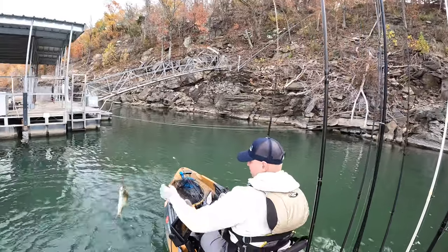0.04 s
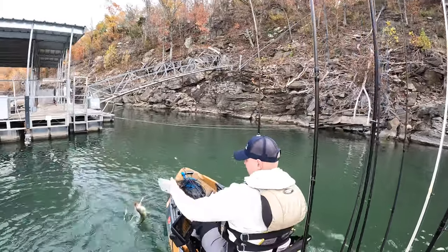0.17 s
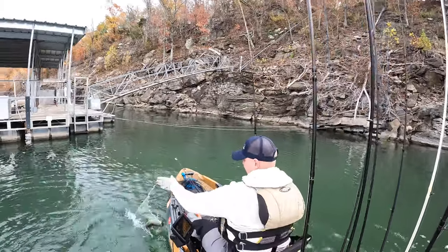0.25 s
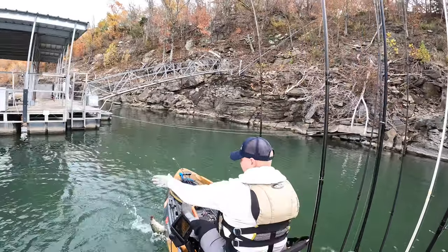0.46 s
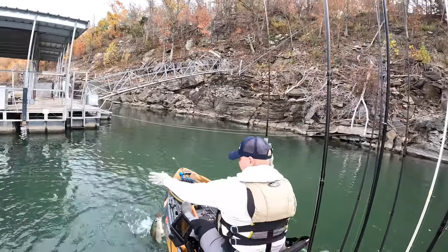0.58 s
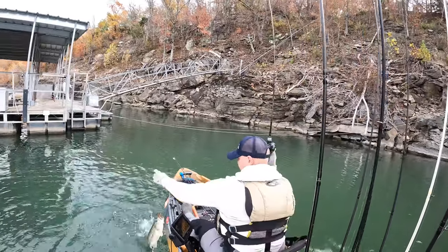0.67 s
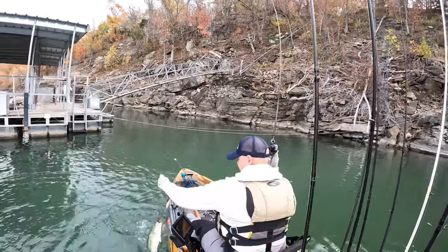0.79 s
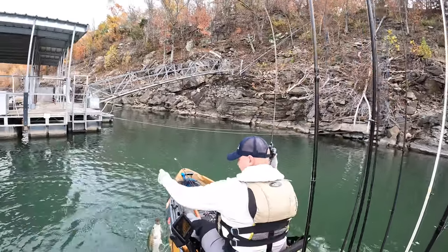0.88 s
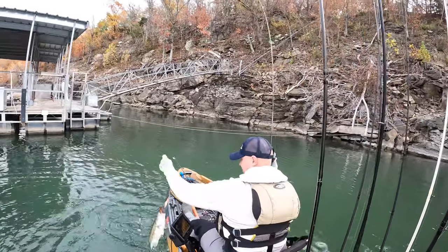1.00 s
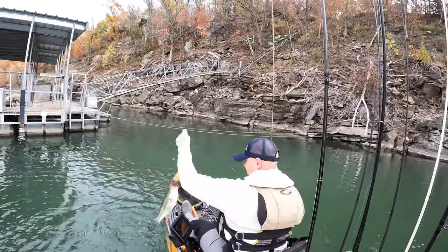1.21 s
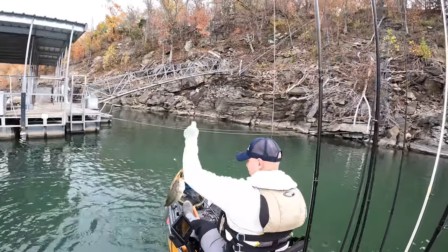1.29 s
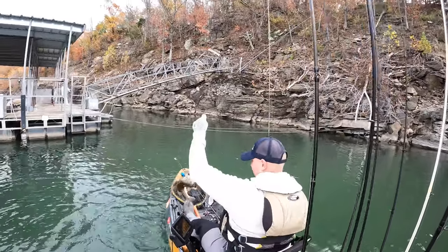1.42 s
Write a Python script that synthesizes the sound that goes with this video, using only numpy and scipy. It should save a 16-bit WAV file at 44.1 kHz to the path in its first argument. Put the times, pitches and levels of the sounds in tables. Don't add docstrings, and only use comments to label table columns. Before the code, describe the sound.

A fish splashes hard at the surface beside a small plastic boat, with crisp spray, gurgling bubbles and hollow hull thumps, then drips and faint knocks; close outdoor stereo microphone on a quiet lake.

```python
import sys
import numpy as np
from scipy import signal
from scipy.fft import rfft, irfft, next_fast_len
from scipy.io import wavfile
from scipy.ndimage import map_coordinates

SR = 44100
rng = np.random.default_rng(int(sys.argv[2]) if len(sys.argv) > 2 else 0)


def gain_from_db(level_db):
    decades = np.asarray(level_db, float) / 20
    return 10 ** decades


def int16_out(signal):
    q = np.round(np.clip(np.atleast_2d(signal).T, -1, 1) * 32767)
    wavfile.write(sys.argv[1], SR, q.astype(np.int16))


N = 63945


def unit(x):
    return x / np.sqrt(np.mean(x ** 2) + 1e-20)


def along(points, hz):
    pitch, value = np.transpose(points)
    return np.interp(np.log(hz + 1), np.log(pitch + 1), value)


def curve(rows):
    time, level = np.transpose(rows)
    return np.interp(np.arange(N) / SR, time, level)


def wobble(rate):
    return map_coordinates(rng.standard_normal(2000), [np.arange(N) * rate / SR])


def coloured(x, points):
    size = next_fast_len(N + 8192)
    gain = gain_from_db(along(points, np.fft.rfftfreq(size, 1 / SR)))
    return irfft(rfft(x, size) * gain, size)[..., :N]


def bubbles(start, gain, hz, cycles, size):
    rise, soft_cycles = 0.24, 1.665
    t = np.arange(size) / SR
    age = t * (hz / cycles)[:, None]
    wave = np.sin(2 * np.pi * hz[:, None] * t * (1 - rise / 4 + rise * np.minimum(age, 2) / 2))
    fade = gain_from_db(-30 * age)
    swell = 1 - np.exp(-t * hz[:, None] / soft_cycles)
    wave *= gain[:, None] * fade * swell
    place = np.round(start * SR).astype(int)[:, None] + np.arange(size)
    return np.bincount(place.ravel(), wave.ravel(), N + SR)[:N]


def swarm(count, hz, spread, cycles, scatter_db, size):
    chance = rng.random((count, 2))
    vary = rng.standard_normal((count, 2))
    pitch = np.minimum(hz * np.exp(spread * np.clip(vary[:, 0], -1.3, 2)), 14000)
    loudness_db = np.minimum(-scatter_db * np.log(1 - chance[:, 1]), 12)
    life = cycles * np.exp(0.45 * vary[:, 1])
    return unit(bubbles(chance[:, 0] * N / SR, gain_from_db(loudness_db), pitch, life, size))


def lake():
    # (pitch [Hz], level [dB])
    lake_colour = [(250, -34), (450, -24), (850, -38), (1300, 0), (3000, -20.5), (6500, -5.5),
                   (11000, -16.5), (15400, -33)]
    level_db, sway_db, side_db = -64.5 - 2.0, 1.5, -11
    hiss = unit(coloured(rng.standard_normal((2, N)), lake_colour))
    mid, side = hiss * gain_from_db(level_db + sway_db * wobble(12.7))
    return np.array([mid + gain_from_db(side_db) * side, mid - gain_from_db(side_db) * side])


def slosh():
    # (time [s], level [dB])
    slosh_level = [(0, -50), (.12, -57.5), (.2, -62), (.3, -38.5), (.6, -48), (.76, -47.5), (.95, -60.5),
                   (1.25, -55.5), (1.45, -51)]
    # (pitch [Hz], level [dB])
    slosh_colour = [(10, 0), (30, -2), (90, -10.5), (230, -13), (380, -22), (550, -27), (1000, -45)]
    sway_db, side_db = 2, -6.5
    push = unit(coloured(rng.standard_normal((2, N)), slosh_colour))
    mid, side = push * gain_from_db(curve(slosh_level) + sway_db * wobble(25.65))
    return np.array([mid + gain_from_db(side_db) * side, mid - gain_from_db(side_db) * side])


def bursts(count):
    # (time [s], peak [dB], length [s], middle pitch [Hz])
    snaps = [(.112, -40, 0.017, 6000), (.137, -40.5, 0.014, 5550), (.1555, -25.5, 0.014, 6670),
             (0.2028, -26.5, 0.022, 6000), (.229, -21, 0.006, 7400), (0.2674, -21.5, 0.0035, 6000),
             (0.286, -19.5, 0.0026, 9000), (.306, -15.5, 0.0051, 7000), (.311, -31.5, 0.026, 4080),
             (.346, -25, 0.0053, 7400), (.3565, -18, .003, 8200), (.361, -20, 0.0063, 3400),
             (.421, -27, 0.011, 6000), (.431, -22, 0.007, 5150), (.439, -28, 0.009, 4550),
             (.453, -29.5, 0.0048, 3570), (.458, -26.5, 0.0039, 6860), (.469, -22, .01, 5300),
             (.482, -29.5, .004, 5000), (.519, -30, 0.0048, 6000), (.574, -26.5, 0.0022, 6800),
             (.596, -26, 0.0027, 6460), (.613, -29, .005, 6000), (.688, -31, 0.0037, 3930),
             (.730, -29.5, 0.0039, 6800), (.746, -28.5, 0.0021, 6700), (.766, -33, 0.0063, 6000),
             (.8305, -31.5, 0.004, 4200), (0.9011, -30.5, 0.0018, 7300), (1.131, -45, 0.0023, 4070),
             (1.147, -51.5, 0.0072, 1424), (1.226, -53, 0.0058, 1133), (1.307, -52, 0.005, 1020),
             (1.325, -54.5, 0.0059, 1660), (1.417, -46.5, 0.0045, 1760), (1.432, -42.5, 0.018, 9200),
             (1.4405, -45, 0.0036, 7470),
             (0.03, -54.5, .004, 2460), (.065, -47, 0.0033, 6000), (0.083, -41.5, .005, 7450),
             (0.507, -30.5, .004, 3400), (0.553, -30.5, .003, 5440), (.738, -34.5, .004, 4230),
             (0.801, -43, .004, 2650), (0.804, -34.5, .003, 7400), (0.827, -39, .002, 8000),
             (0.864, -46, .008, 1900), (.875, -43, .005, 4830), (0.932, -50, .003, 2560),
             (0.947, -49, .004, 5500), (.957, -39, .004, 4470), (.967, -41.5, .005, 5130),
             (1.33, -60, .002, 9000), (1.386, -51, .003, 2010)]
    tears = np.array(snaps)
    start, db, length, hz = np.repeat(tears, count, axis=0).T
    turn = np.tile(np.linspace(.01, 1, count) ** 1.4, len(tears))
    vary = rng.standard_normal((len(start), 3))
    pitch = hz * np.exp(0.423 * vary[:, 1])
    gain = gain_from_db(db - 1.9 - 15.4 * turn + 1.8 * np.clip(vary[:, 0], -2, 1.6))
    gain *= np.sqrt(length / 0.0025) * np.minimum(turn / 0.11, 1)
    gain *= (pitch < 14500) / (1 + (pitch / 12500) ** 2)
    life = 7 * np.exp(0.28 * vary[:, 2])
    return bubbles(start + 1.5 * length * turn, gain, np.clip(pitch, 400, 14500), life, size=400)


def spray():
    # (time [s], level [dB])
    spray_level = [(0, -93), (.08, -63.5), (.15, -50), (.2, -53.5), (.33, -37.5), (.39, -45), (.45, -45),
                   (.55, -50), (.72, -51.5), (.79, -58), (.97, -62.5), (1.05, -71.5)]
    # (pitch [Hz], level [dB])
    spray_colour = [(1470, -39), (2500, -5), (3360, -8), (7640, -2.5), (12000, -23), (15400, -44)]
    sway_db = 2
    hiss = unit(coloured(rng.standard_normal(N), spray_colour))
    fizz = swarm(count=4000, hz=6000, spread=0.451, cycles=7.7, scatter_db=6.5, size=200)
    mix = gain_from_db(-3) * hiss + gain_from_db(-3) * fizz
    return gain_from_db(curve(spray_level) + sway_db * wobble(59.9)) * mix + bursts(count=90)


def churn():
    # (time [s], level [dB])
    churn_level = [(.08, -69.5), (.16, -53.5), (.22, -38.5), (.36, -35.5), (.41, -41), (.465, -38),
                   (.52, -41), (.59, -46.5), (.67, -39.5), (.76, -50.5), (.8, -55.5), (.92, -61),
                   (1.1, -71.5), (1.2, -75.5), (1.45, -62)]
    # (pitch [Hz], level [dB])
    churn_colour = [(400, -18), (750, -7), (1100, -10), (2400, -9.5), (5000, -19.5), (8000, -50)]
    # (time [s], peak [dB], pitch [Hz], life [cycles])
    big_bubbles = [(0.1215, -25, 3650, 8.3), (0.144, -27, 2370, 7.2), (0.1605, -15, 2060, 9.2),
                   (0.1617, -21.5, 2000, 16.4), (0.164, -41.5, 520, 24), (0.176, -25, 1380, 7.5),
                   (0.2028, -13, 1210, 3.9), (0.207, -8.5, 1100, 4.6), (.222, -19.5, 2800, 7.4),
                   (.237, -13.5, 565, 4.1), (.248, -20.5, 2120, 7.7), (0.2521, -20, 296, 4.1),
                   (0.267, -15, 1890, 4.6), (.271, -21.5, 520, 7.9), (.309, -18, 1700, 12),
                   (0.314, -4, 1600, 2.3), (0.3387, -9.5, 2540, 4.8), (0.3658, -5.5, 2200, 5.4),
                   (.542, -34.5, 1215, 30), (.563, -20, 1030, 4.1), (.500, -24, 1200, 6.6),
                   (.508, -27.5, 970, 7.4), (0.549, -27.5, 1800, 6), (.604, -31.5, 950, 9.7),
                   (0.613, -16, 1350, 1.8), (.619, -23, 1520, 3.9), (.624, -26.5, 924, 4.9),
                   (.632, -26.5, 855, 6.1), (.651, -22.5, 1080, 4.5), (.654, -27, 2450, 9.8),
                   (0.671, -36.5, 1200, 14), (.714, -26, 1800, 6.6), (0.729, -36, 1840, 15),
                   (0.455, -25, 1110, 11), (.460, -19.5, 1790, 7.5), (0.687, -25, 2400, 10.7),
                   (.746, -32.5, 1375, 17)]
    # (time [s], peak [dB], pitch [Hz], life [cycles])
    drips = [(.100, -50, 1090, 23), (.823, -31.5, 2360, 12), (0.83, -27, 1500, 14), (.8318, -20, 1900, 3.6),
             (.830, -22, 2000, 12.5), (.838, -39, 2800, 8.8), (0.8294, -25.5, 1293, 22.3),
             (0.8734, -26, 1368, 9.8), (.876, -35, 4200, 12), (.850, -39, 6840, 16), (0.893, -44, 3300, 18),
             (.832, -35.5, 7900, 16), (.905, -54, 770, 27), (0.943, -38.5, 3400, 12.5),
             (.947, -44, 3150, 27), (.967, -42.5, 5600, 36), (.970, -47, 3000, 20), (.929, -44.5, 1570, 12),
             (.940, -46, 1230, 16), (1.13, -51, 1080, 35), (1.274, -56, 1940, 34), (0.028, -51, 1010, 11.5),
             (0.94, -54, 570, 3.1), (1.1, -51, 705, 8.1), (1.3075, -49, 750, 7), (1.2, -38, 2100, 5.7),
             (1.212, -53, 1840, 11), (1.437, -50, 1520, 10)]
    wash = unit(coloured(rng.standard_normal(N), churn_colour))
    crowd = swarm(count=1500, hz=1700, spread=0.3475, cycles=8.35, scatter_db=3.5, size=700)
    mix = gain_from_db(-4.5) * wash + gain_from_db(-2) * crowd
    gurgle = gain_from_db(curve(churn_level) + 2.0 * wobble(70.13)) * mix

    deep = swarm(count=900, hz=520, spread=0.357, cycles=4.4, scatter_db=3.5, size=1500)
    gulp_s = (.17, .23, .35, .5)
    gulp_db = -35.5 + np.array([-20, -1.5, -7.5, -6.5])
    gulp = gain_from_db(np.interp(np.arange(N) / SR, gulp_s, gulp_db, -95, -95)) * deep

    start, db, hz, cycles = np.concatenate([big_bubbles, drips]).T
    return gurgle + gulp + bubbles(start, gain_from_db(db + 4), hz, cycles, size=2000)


def hull():
    # (time [s], peak [dB], favoured pitch [Hz])
    thumps = [(0.3599, -10, 216), (0.3714, -12.5, 95), (.384, -23, 48), (0.425, -21, 295), (.433, -26, 317),
              (.439, -14, 253), (.451, -23.5, 290), (.459, -21.5, 227), (.466, -22.5, 320),
              (0.53, -35.5, 63.6), (0.581, -33, 75), (.804, -40, 453), (1.149, -49, 455), (1.26, -49, 400),
              (1.325, -45.5, 295), (1.381, -44.5, 147), (1.424, -42, 82.5)]
    # (pitch [Hz], level [dB], time to fade 60 dB [s])
    hull_tones = [(45.2, 7, 0.21), (69, 2.85, 0.43), (115.5, 3.5, 0.15), (185.8, 0.5, 0.11),
                  (263.6, 0.5, 0.073), (352.7, 0, 0.0784), (460, -5, 0.066), (639, 0.5, 0.028),
                  (948, 7, 0.048)]
    out = np.zeros(N + SR)
    t = np.arange(SR // 2) / SR
    for start, db, blow_hz in thumps:
        boom = np.zeros(len(t))
        for k, (hz, level, t60) in enumerate(hull_tones):
            sign = (-1) ** (k + 1)
            fade = gain_from_db(level + 1.6 * rng.standard_normal() - 60 * t / t60)
            swell = 1 - np.exp(-t * hz / 0.04)
            favour = 1 / (1 + (np.log(hz / blow_hz) / 0.5) ** 2)
            boom += sign * favour * fade * swell * np.sin(2 * np.pi * hz * t)
        first = round(start * SR)
        out[first:first + len(t)] += gain_from_db(db - 5.5) * boom
    return out[:N]


def bank(x):
    t60, delay_s = 0.079, 0.0047
    t = np.arange(SR // 4) / SR
    tail = rng.standard_normal((2, len(t))) * gain_from_db(-60 * t / t60) * (t > delay_s)
    return signal.fftconvolve(x[None], tail / np.linalg.norm(tail[0]), axes=1)[:, :N]


def scene():
    # (pitch [Hz], level [dB])
    pan = [(60, -6.5), (160, -0.5), (1000, 1), (4000, 0), (9000, 5.5), (14000, 4)]
    bank_db, width_db = -15, -18
    water = spray() + churn()
    boom = hull()
    echo, wide_echo = bank(water)
    near = water + gain_from_db(bank_db) * echo + boom
    side = gain_from_db(width_db) * coloured(wide_echo, [(6000, 0.5), (13000, 2.4)])
    side += gain_from_db(-14) * bank(boom)[0]
    left = coloured(near, [(hz, db / 2) for hz, db in pan]) + side
    right = coloured(near, [(hz, -db / 2) for hz, db in pan]) - side
    return np.array([left, right]) + slosh() + lake()


def band_limit(x):
    return signal.sosfilt(signal.butter(12, 15520, fs=SR, output="sos"), x)


def record(dry):
    # (pitch [Hz], level [dB])
    mic = [(20, 0.5), (11000, 1.5), (14000, -2.5), (15500, -28), (15700, -86)]
    return band_limit(coloured(dry, mic))


dry = scene()
out = record(dry)
int16_out(out)
```